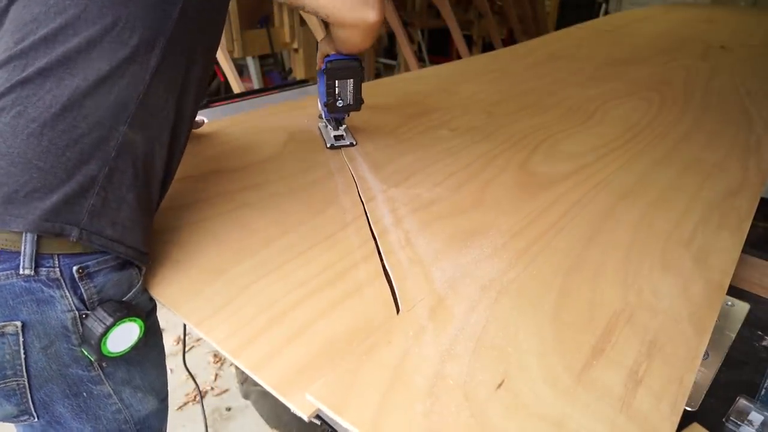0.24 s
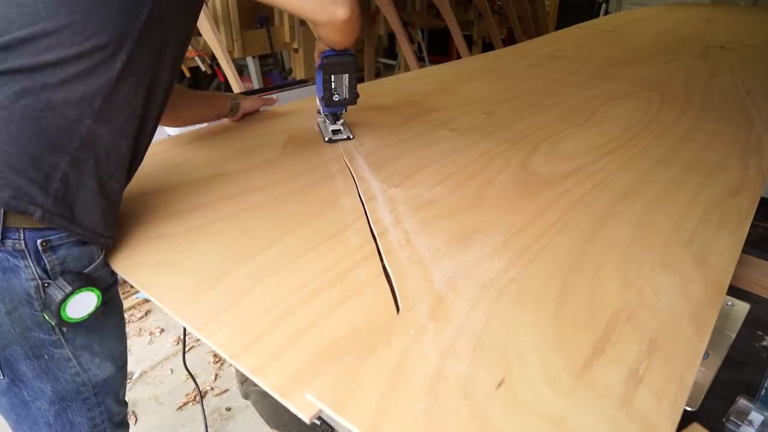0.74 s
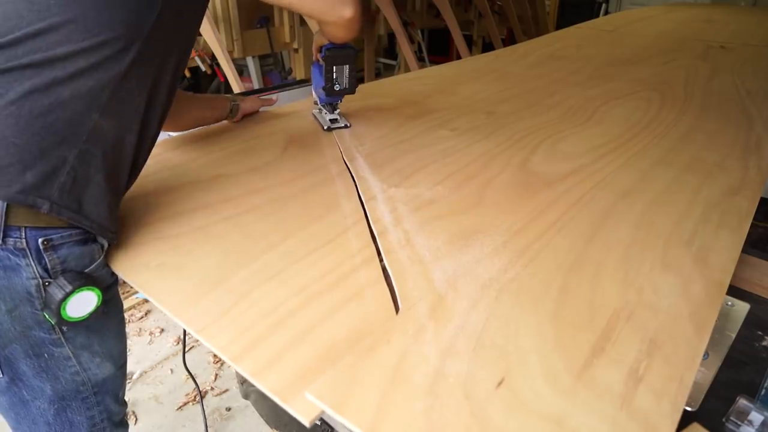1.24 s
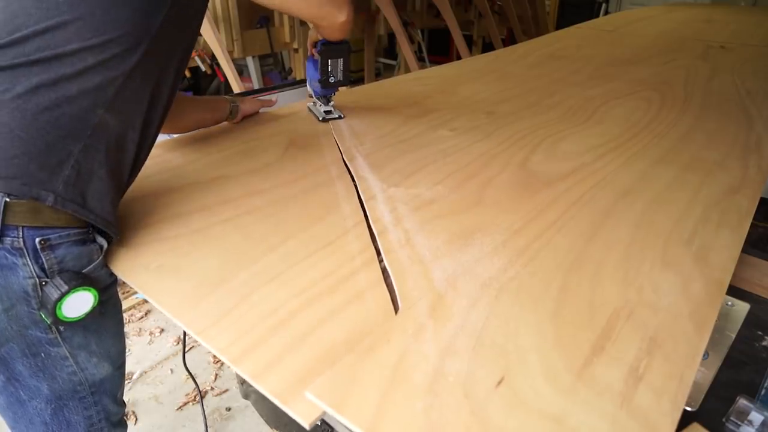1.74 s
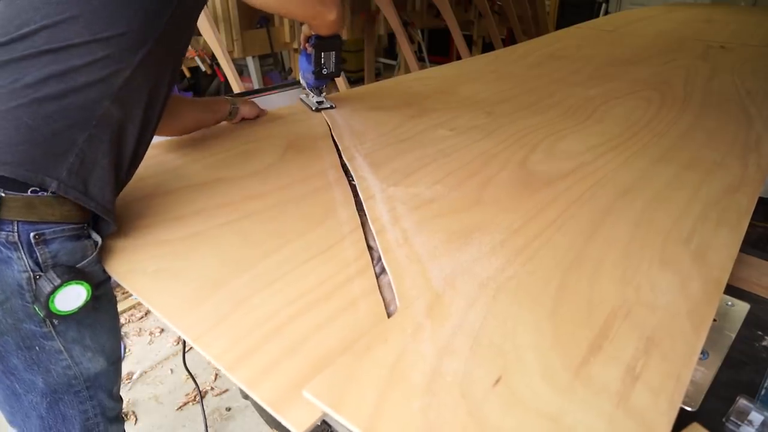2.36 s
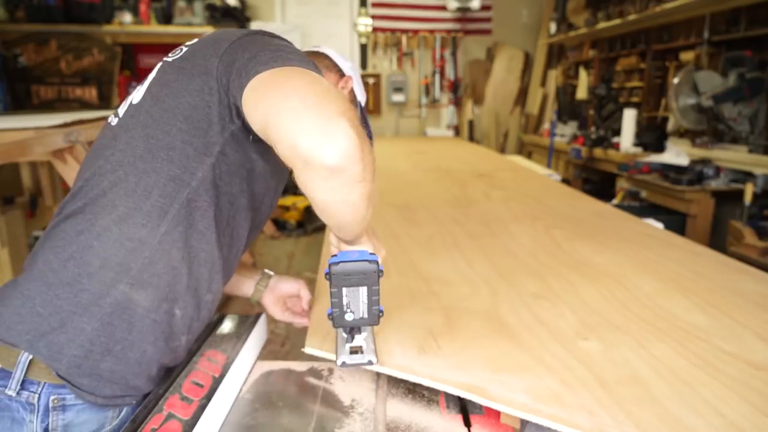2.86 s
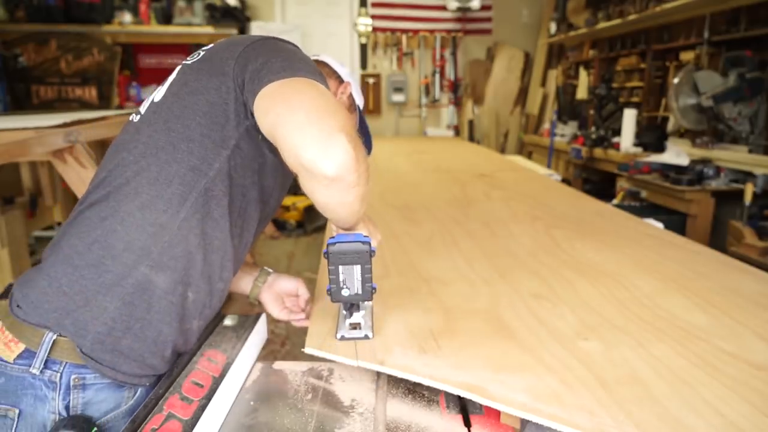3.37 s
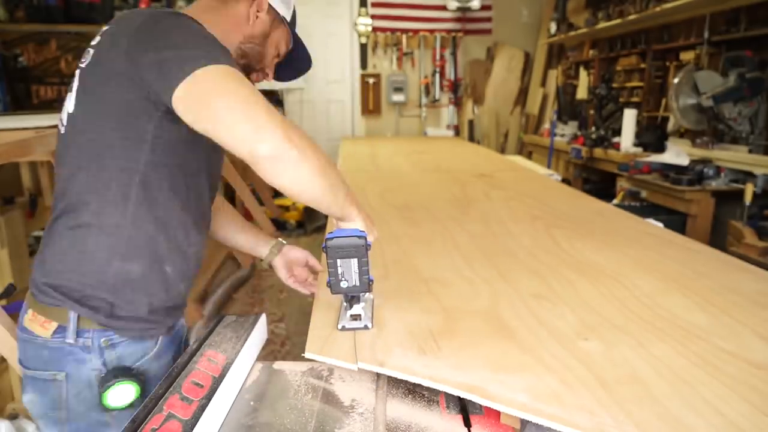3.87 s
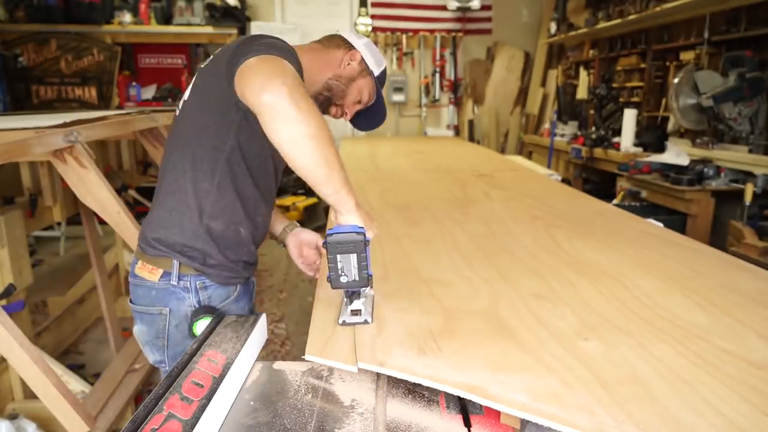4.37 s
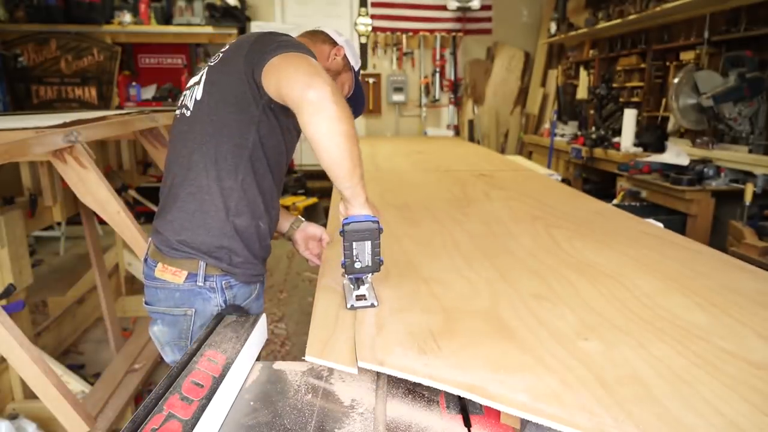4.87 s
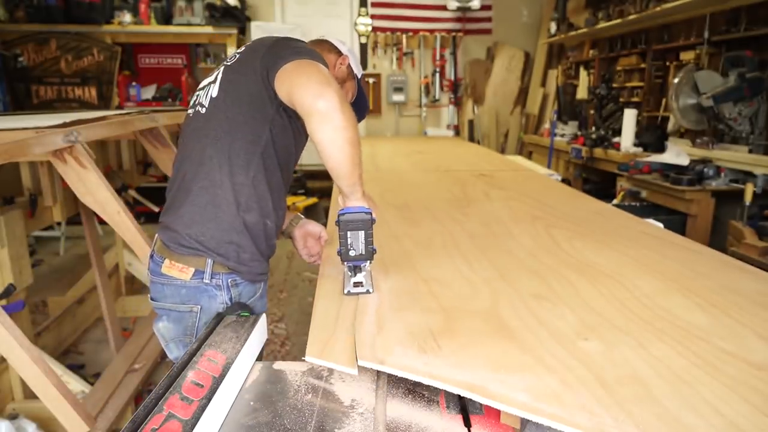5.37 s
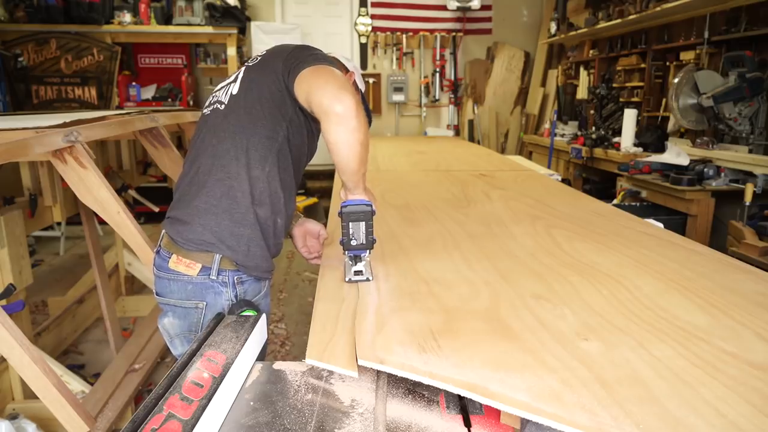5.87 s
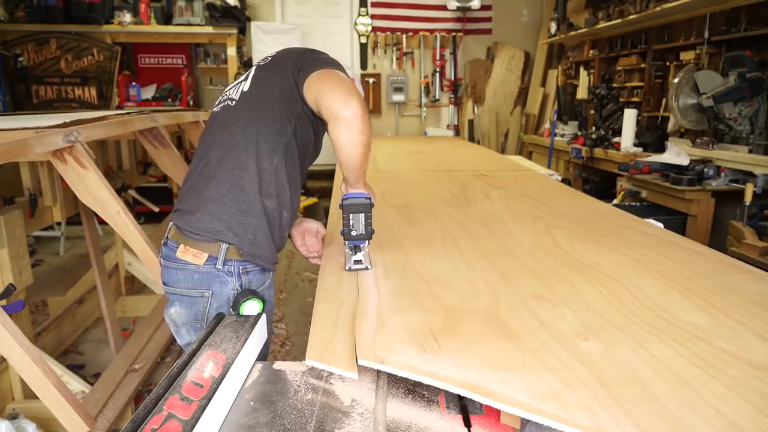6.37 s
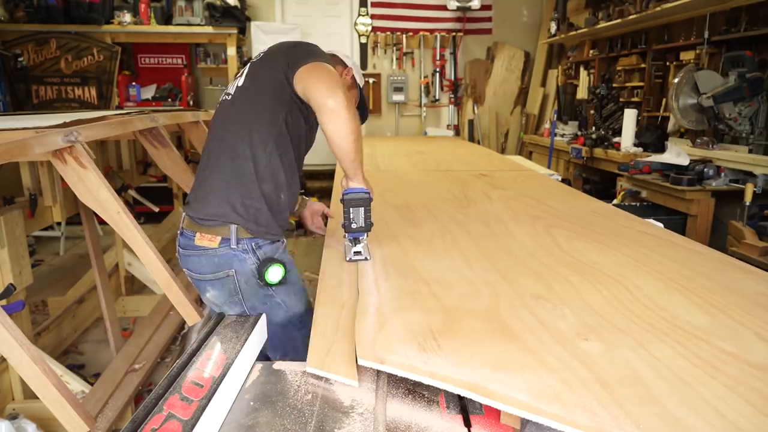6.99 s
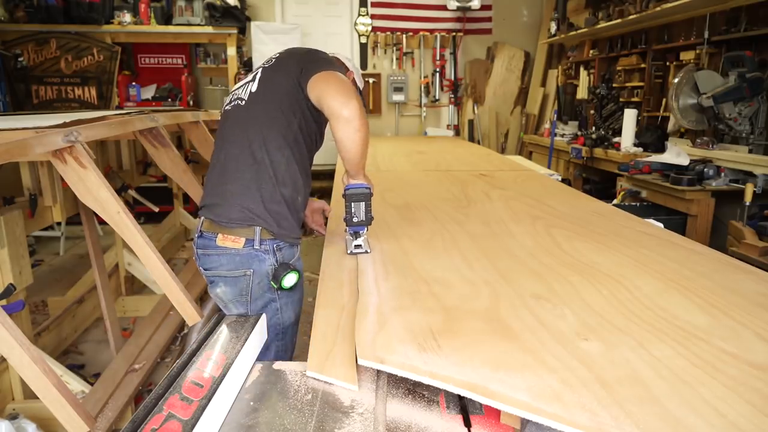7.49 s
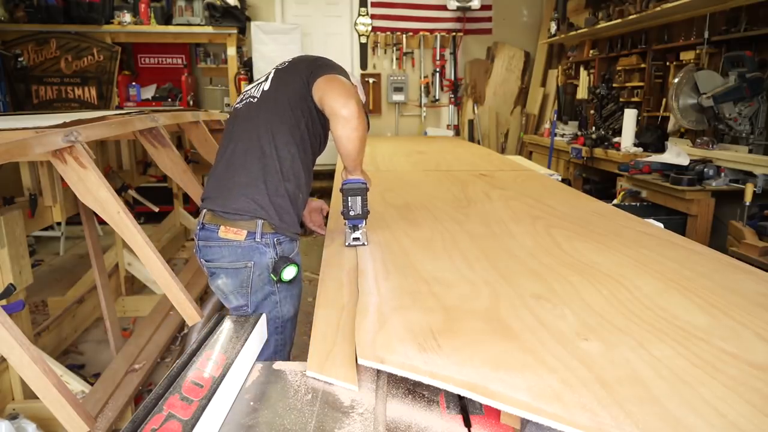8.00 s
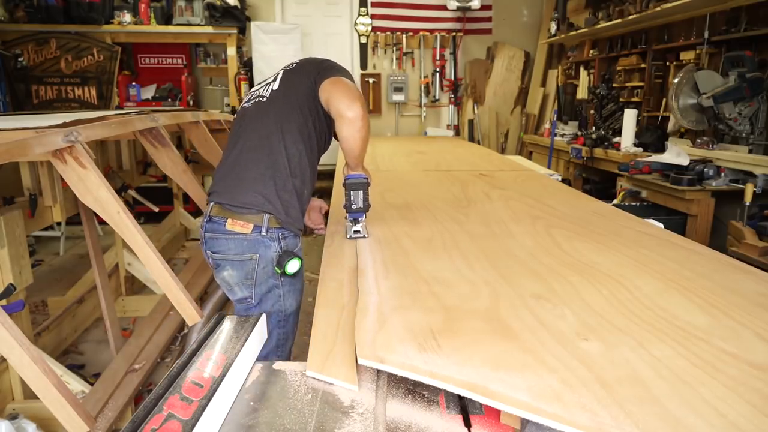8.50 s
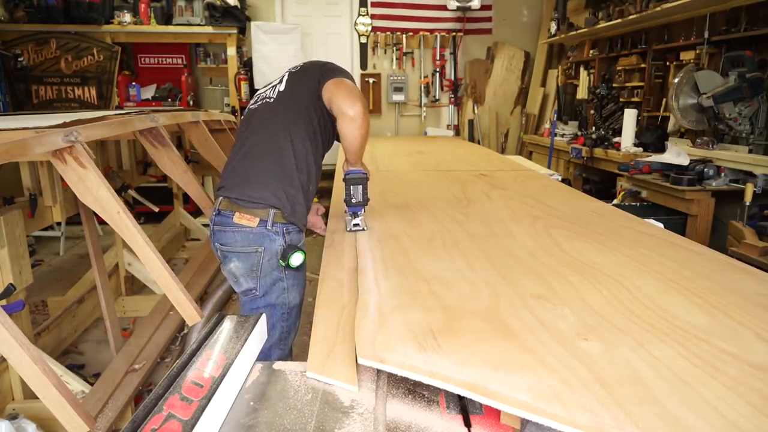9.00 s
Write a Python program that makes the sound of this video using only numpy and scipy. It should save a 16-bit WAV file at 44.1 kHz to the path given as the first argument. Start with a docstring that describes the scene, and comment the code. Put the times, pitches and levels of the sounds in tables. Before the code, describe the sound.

A cordless jigsaw is already cutting plywood, heard close and in fast motion, its strokes blurring into a bright, rasping whine over the sheet's softer hum. It stops at 0.4 seconds and restarts with a trigger click at 0.6. At about 2.5 seconds an offcut drops with a quick clatter; after an instant of silence the saw is back at full speed. It cuts out near 3.8 seconds, then stutters back at 4 seconds with faint clicks, lower in pitch, the blade catching with a sharp crack at 4.2. The pitch jumps back up at 4.5 and holds, with a shifting metallic ring. Another short gap comes at 6.9 seconds; the saw resumes lower, steps up again around 8.1 and keeps cutting until about 9.3. The small workshop adds only a very short reverberation, with almost no background noise.

```python
"""A rasping whine: a cordless jigsaw cuts plywood in a small workshop, heard in fast motion, so that
its strokes blur into a pitch. The crank knocks and the teeth rasp in time with the stroke, and the
sheet hums in forced vibration on harmonics of the stroke rate. The trigger is let go several times;
once an offcut drops, and after a brief silence the sound jumps to the saw already running."""
import sys
import numpy as np
from scipy import signal
from scipy.fft import rfft, irfft, next_fast_len
from scipy.io import wavfile
from scipy.ndimage import map_coordinates

SR = 44100
rng = np.random.default_rng(int(sys.argv[2]) if len(sys.argv) > 2 else 0)


def wrap_up_sound(samples):
    """Save the sound to the file named by the first command line argument, as 16-bit audio."""
    columns = np.atleast_2d(samples).T
    # keep every value between -1 and 1, then stretch to whole-number steps
    tamed = np.clip(columns, -1, 1)
    steps = np.round(tamed * 32767).astype(np.int16)
    wavfile.write(sys.argv[1], SR, steps)


N = 407484


def saw():
    """Periodic forcing: one stroke drives rasp and hum, from spin-up until the brake grips."""
    # Each row: start, stop and spin-up time in seconds, starting drop in dB, hum gain in dB.
    stretches = [(0, 0.389, .01, 3, 1), (.567, 1.96, .055, 22.5, -1), (1.96, 2.536, .01, 8, 0),
                 (2.642, 3.753, .01, 0, -3), (4.02, 4.111, 0.049, 16, -6.5), (4.16, 4.488, 0.044, 20, 1),
                 (4.487, 6.902, .01, 1, 1), (7.066, 8.081, .045, 28, 0), (8.08, 9.3, .01, -5, 1.5)]
    # Each entry: the place on the sheet where that stretch is cut, as an index.
    places = [0, 1, 7, 2, 3, 3, 4, 5, 6]
    # Each row: time in seconds, strokes per second.
    pace = [(0, 186.9), (.63, 186.3), (1.03, 186.7), (1.64, 186.3), (1.84, 187), (2.0, 185.5),
            (2.25, 186.2), (2.55, 185.6), (2.64, 188.7), (3.35, 187.6), (3.76, 188.6), (4.02, 162.6),
            (4.12, 162.5), (4.16, 131), (4.2, 138), (4.34, 141), (4.36, 151), (4.466, 153.5), (4.5, 187),
            (4.65, 188.7), (5.28, 187.5), (6.45, 187.8), (6.55, 186.6), (6.9, 187.7), (7.07, 151.3),
            (7.58, 149.5), (8.05, 150.5), (8.09, 187), (8.16, 187.6), (8.71, 186.6), (8.8, 187.4),
            (9.24, 186.9)]
    # Load on the blade. Each row: time in seconds, then rasp gain, its lower-band gain and hum gain in dB.
    load = [(0, -31.5, 4.5, -39.5), (.39, -32, 5, -44.5), (.65, -31.5, 3, -40.5), (1.26, -33.5, 2, -42),
            (1.85, -34, -1.5, -45), (2.0, -34.5, -0.5, -38.5), (2.4, -33.5, 2.5, -42),
            (2.543, -34, -5, -34.5), (2.642, -32, 4, -41), (2.96, -33.5, 1.5, -45.5),
            (3.75, -31.5, -0.5, -44.5), (4.08, -33.5, 5, -43), (4.12, -37.5, 6, -46),
            (4.2, -29, -0.5, -46.5), (4.45, -33, 0, -49.5), (4.52, -30, -9, -48), (4.8, -29, -2.5, -47),
            (5.87, -30, -3, -48.5), (6.77, -29, 2, -46), (6.91, -30.5, 4, -47), (7.12, -32.5, -5, -48),
            (8.04, -33, -3.5, -46.5), (8.27, -31, 0, -48.5), (9.24, -33, -5.5, -51.5)]
    # Each entry: spread of the hum's phases at one place, in cycles; zero is one sharp blow a stroke.
    blurs = [0.1, 0.12, 0.2, 0.42, 0.27, 0.27, 0.13, 0.032]
    hum_lag, hum_depth = 1.74, 0.92  # the hum's rise time and starting drop, relative to the rasp's
    load_s, *load_curves = np.transpose(load)
    sawing, humming, turns = np.zeros((3, N))
    join = int(.008 * SR)
    for (start, stop, spin_up, down_db, gain_db), place in zip(stretches, places):
        at = np.arange(int(start * SR), min(int(stop * SR) + join, N))
        s = at / SR
        rasp_db, lower_db, hum_db = (np.interp(s, load_s, curve) for curve in load_curves)
        rasp_rise = from_db(-down_db * np.clip(1 - (s - start) / spin_up, 0, 1))
        hum_rise = from_db(-hum_depth * down_db * np.clip(1 - (s - start) / (hum_lag * spin_up), 0, 1))
        # the motor speed flutters a little under load; one crank turn is one stroke
        stroke_hz = np.interp(s, *np.transpose(pace)) * (1 + .001 * drift(15.0, len(at)))
        turns = turns[-join - 1] % 1 + np.cumsum(stroke_hz) / SR
        # stretches that overlap cross-fade at equal power
        fade_in = at - at[0] + join * (not sawing[at[0]])
        fade_out = at[-1] - at + join * (at[-1] == N - 1)
        edges = np.sqrt(np.clip(np.minimum(fade_in, fade_out) / join, 0, 1))
        rumble = bench_rumble(len(at))
        hum = sheet_hum(s, turns, place, blurs[place], hum_db)
        rasp = blade_ringing(blade_rasp(turns, place, lower_db, blurs[place]), s)
        humming[at] += edges * hum_rise * from_db(gain_db) * hum
        sawing[at] += edges * rasp_rise * from_db(rasp_db) * (rasp + rumble)
    return sawing, humming


def blade_rasp(turns, place, lower_db, blur):
    """Modal excitation: knocks, tooth noise and whine drive the many modes of blade and shoe."""
    # Contacts within one stroke. Each row: position as a share of the stroke, relative level in dB.
    contacts = [(.02, 6), (0.272, 2.5), (.5, 8.5), (.76, -19)]
    # One rasp spectrum per place. Each point: frequency in Hz, relative gain in dB.
    spectra = [
        [(1470, -41), (2500, -8), (2890, -5.5), (3880, -13.5), (6610, -0.5), (7830, -4), (9210, -1), (10300, 0),
         (12000, -6.5), (15800, -10)],
        [(1760, -16), (3000, -5), (3350, -17), (4100, -13.5), (4670, -7.5), (4970, -9), (6120, -7), (7280, -8),
         (9400, -1.5), (10600, -5.5), (13300, -14), (15700, -6)],
        [(1470, -46), (2500, -13), (3100, -20.5), (4190, -12.5), (6160, -7), (7480, -7), (9210, -6),
         (11200, -6.5), (15800, -15.5)],
        [(1470, -44), (2500, -19.5), (4420, -13), (5320, -8.5), (7140, 1), (8460, -10), (9000, -10),
         (12900, -8), (15800, -7.5)],
        [(1470, -23), (2600, -20), (3760, -18), (4710, -9), (7480, -7.5), (9140, 0), (11300, -2.5), (12200, -6),
         (15800, -8)],
        [(1470, -41), (2500, -14.5), (3130, -20.5), (3730, -11.5), (5240, -8.5), (5750, -14), (6710, -5.5),
         (8390, -5), (9790, -10.5), (12700, -0.5), (15800, -10.5)],
        [(1470, -47), (2500, -5.5), (2870, -7), (3200, -20.5), (4820, -8.5), (5240, -7), (5710, -8),
         (8080, -10), (8930, -3.5), (11300, -1.5), (15800, -8.5)],
        [(1760, -24), (3000, -11), (3500, -8), (4100, -12.5), (4700, -6), (6100, -8), (7500, -6.5), (9200, -1),
         (10600, -8.5), (13300, -16), (15700, -3.5)],
    ]
    # Each entry: level of the whine against the tooth noise at one place, in dB.
    whine_db = [6, 8, 6, 2, 6, 7, 6, 8]
    burst_s, jitter_s, knock_spread_db, tilt_db_per_octave = 0.0006, 2.2e-4, 5, 3.5
    size, strokes = len(turns), np.arange(int(turns[-1]))
    shares, contact_db = np.transpose(contacts)
    at = np.interp((strokes[:, None] + shares).ravel(), turns, np.arange(size))
    strength = from_db(np.tile(contact_db, len(strokes)) + rng.normal(0, 1.65, len(at)))
    clicks = np.zeros(size)
    clicks[at.astype(int)] = strength
    pole = np.exp(-1 / (burst_s * SR))
    bursts = rms_one(signal.lfilter([1], [1, -2 * pole, pole * pole], clicks))
    teeth = rms_one(rng.standard_normal(size) * (bursts + from_db(-2.5)))
    scrape = teeth + from_db(whine_db[place]) * rms_one(gear_whine(turns, blur))
    modes = 0
    for k, hz in enumerate(np.arange(2200, 16200, 500)):
        # each contact reaches each mode with its own timing, strength and sign
        arrivals = np.clip(at + rng.normal(0, jitter_s * SR, len(at)), 0, size - 1).astype(int)
        uneven = from_db(knock_spread_db * np.clip(rng.normal(size=len(at)), -3, 1.1))
        knocks = np.zeros(size)
        knocks[arrivals] = strength * uneven * rng.choice([-1, 1], len(at))
        drive = scrape + from_db(5.5 + tilt_db_per_octave * np.log2(hz / 8000)) * rms_one(knocks)
        swell = np.exp(0.24 * drift(0.9, size))  # modes swell and sink as the saw moves and tilts
        modes = modes + (-1) ** k * swell * resonance(drive, hz + rng.uniform(-120, 170), width_hz=660)
    flattened = np.tanh(rms_one(modes) / 3.0)  # the hardest knocks saturate at three times the rms
    rasp = colour(flattened, spectra[place])
    lower_band = signal.sosfilt(signal.butter(4, 7500, fs=SR, output="sos"), rasp)
    return rasp + lower_band * (from_db(lower_db) - 1)


def gear_whine(turns, blur):
    """Periodicity gives a line spectrum: gears and teeth repeat nearly the same scrape each stroke."""
    # The gear mesh stands out near 58 teeth a stroke. Each row: harmonic number, relative level in dB.
    spectrum = [(16, 2), (24, -3.5), (36, -0.5), (40, -8), (54, -8), (59, 0.5), (63, 1.5), (90, -8.5)]
    patterns_per_s, phase_spread = 2.02, 4.01 * blur
    age = np.arange(len(turns)) / SR * patterns_per_s
    heights = from_db(np.interp(np.arange(513), *np.transpose(spectrum), left=-60, right=-60))
    phases = phase_spread * rng.normal(size=(int(age[-1]) + 2, 513))
    patterns = irfft(heights * np.exp(2j * np.pi * phases))
    # each pattern lasts one stroke and slowly blends into the next
    return map_coordinates(patterns, [age, turns % 1 * 1024], order=1, mode="grid-wrap")


def blade_ringing(rasp, s):
    """Resonance: lightly damped blade modes rise out of the rasp and sink back."""
    # Each row: time of the peak in seconds, frequency in Hz, gain in dB, half-width in seconds.
    rings = [(0.087, 9600, 3, .15), (0.29, 10570, -2, .1), (0.783, 9250, 1.5, .2), (1.0, 10400, 3.5, 0.38),
             (2.184, 9000, 1.5, 0.16), (3.4, 9370, 5.5, 0.61), (3.45, 8220, -4, 0.15), (5.4, 9000, -6, .2),
             (5.77, 9200, 0, 0.14), (6.396, 10900, -1, 0.56), (8.4, 5200, 5, 0.58), (7.97, 5200, 4, .15),
             (2.515, 2500, 3, .03), (2.53, 4100, 3, .02)]
    return rasp + sum(from_db(db) * np.exp(-((s - at) / span) ** 2) * resonance(rasp, hz, width_hz=292)
                      for at, hz, db, span in rings if s[0] < at < s[-1])


def sheet_hum(s, turns, place, blur, hum_db):
    """Forced vibration: the sheet follows harmonics of the stroke, each wavering as the saw moves."""
    # Each entry: harmonic number of one upper partial.
    upper_harmonics = [6, 8, 9, 10, 11, 12, 13, 14, 15, 16]
    # Each row: relative levels of the upper partials at one place, in dB.
    upper_db = [
        [-31, -19, -13, -14, -7, -29, -11, -16, -5.5, -25],
        [-6.5, -4.5, -7.5, -1, -7, -5.5, -6.5, 1.5, -0.5, -33],
        [-1.5, -8.5, -15, 0.5, 4, -5.5, 5.5, -3, 4, -17.5],
        [-13, 6, 3, 0, 2, -16, -2, -10, -17, 1],
        [-9.5, -4, -14, -12, 1, 0.5, 2, -4, -3, -36],
        [-20, -3, -2, 2, 2, -10, 0, -1.5, -2, -9],
        [-1.5, 3.5, -6, -1, 1, -5, 4, 8.5, 1, -22],
        [-10, -7.5, -13, -5.5, -37, -2.5, -10.5, -2.5, -10, -13],
    ]
    # Each entry: harmonic number of one low tone.
    low_harmonics = [1, 2, 3, 4, 5, 7]
    # Each row: levels of the low tones at one place, in dB before the stretch's gain.
    low_db = [
        [-77, -76, -71, -69.5, -62, -69],
        [-75.5, -75, -71, -64.5, -60, -59.5],
        [-78.5, -77, -74.5, -73, -64.5, -59],
        [-91, -81.5, -72.5, -78, -69.5, -60],
        [-83.5, -74.5, -71, -70.5, -67.5, -60.5],
        [-84, -74, -71, -87, -63.5, -62.5],
        [-81, -74.5, -80, -79, -70, -68],
        [-83, -64, -65.5, -60, -56.5, -48.5],
    ]
    # Sheet noise under the hum. Each row: frequency in Hz, relative spectral level in dB.
    chatter_spectrum = [(400, -32.5), (700, -17.5), (1000, -6.5), (2200, 4.5), (3500, 0), (5000, -11)]
    flutter_db_per_harmonic = 0.1466
    whistle_harmonic = 23  # a high whistle near 4.3 kHz that swells and fades
    size, upper, tones = len(turns), 0, 0
    for k, level_db in zip(upper_harmonics, upper_db[place]):
        wave = np.cos(2 * np.pi * (k * turns + blur * rng.normal()))
        waver_db = 1.52 * drift(4.7, size) + flutter_db_per_harmonic * k * drift(55.0, size)
        upper = upper + from_db(level_db + waver_db) * wave
        tones = tones + sheet_swell(k, s) * from_db(3 * drift(30.0, size)) * wave
    for k, level_db in zip(low_harmonics, low_db[place]):
        height = from_db(level_db + 2.17 * drift(2.25, size)) + sheet_swell(k, s)
        flutter = from_db(1.5 * drift(30.0, size))
        tones = tones + height * flutter * np.cos(2 * np.pi * (k * turns + blur * rng.normal()))
    tones = tones + sheet_swell(whistle_harmonic, s) * np.cos(2 * np.pi * whistle_harmonic * turns)
    throb = 1 + 0.27 * np.cos(2 * np.pi * turns)
    chatter = colour(rng.standard_normal(size) * throb, chatter_spectrum)
    body = from_db(-5.0) * rms_one(upper) + from_db(-6.5) * chatter
    return from_db(hum_db) * body + np.sqrt(2) * tones


def sheet_swell(harmonic, s):
    """Response depends on the driving point: a harmonic swells as the saw passes a lively spot."""
    # Each row: time of the peak in seconds, harmonic number, level in dB, half-width in seconds.
    swells = [(0.033, 7, -47.5, 0.21), (0.16, 13, -49.5, .25), (1.22, 13, -48, 0.31), (5.68, 13, -58, 0.11),
              (2.6, 23, -62, .4), (0.91, 7, -49.5, 0.11), (1.5, 3, -62, 0.39), (1.3, 5, -62.5, 0.69),
              (2.2, 2, -64.5, 0.16), (2.49, 4, -50.5, 0.1), (2.49, 5, -50, 0.052), (2.8, 1, -73, 0.35),
              (2.87, 7, -49, 0.052), (2.987, 5, -53, 0.029), (3.651, 3, -66, 0.27), (4.3, 7, -64, 0.046),
              (4.46, 7, -50, 0.031), (4.7, 5, -51.5, 0.11), (2.32, 7, -54, .07), (5.9, 1, -71, 0.98),
              (5.776, 7, -47, 0.077), (6.048, 11, -53.5, 0.11), (6.45, 11, -59.5, .3), (6.63, 5, -60, 0.13),
              (7.315, 7, -59, 0.2), (7.55, 5, -55, 0.075), (7.973, 3, -63, 0.1), (8.2, 13, -57.5, 0.23),
              (1.54, 9, -56.5, 0.56), (3.1, 11, -60.5, 0.32), (8.8, 8, -63, 0.14), (8.868, 11, -60, .12),
              (9.0, 1, -67, 0.36), (9.15, 3, -70, 0.19)]
    return sum(from_db(db) * np.exp(-np.abs((s - at) / span) ** 1.83)
               for at, k, db, span in swells if round(k) == harmonic)


def shoe_bumps():
    """Free vibration: the shoe bumps the sheet, whose low modes ring down."""
    # Each row: time in seconds, strength in dB.
    bumps = [(.655, -47), (.828, -47), (.922, -49), (.963, -56), (1.11, -55), (1.243, -57), (4.855, -51)]
    # Each row: frequency in Hz, relative level in dB, time to fall 60 dB in seconds.
    sheet_modes = [(75, -6.5, 0.03), (140, -10, 0.02), (233, -1, 0.012)]
    return struck(bumps, sheet_modes)


def blade_snaps():
    """Impulse response: the blade catches, and heavily damped high modes give short bright cracks."""
    # Each row: time in seconds, strength in dB.
    catches = [(4.1962, -23), (4.2065, -26), (4.2152, -32)]
    return struck(catches, modes=[(4700, -3.0, 0.0079), (6940, -16, 0.0035), (11000, 9, .004)])


def offcut_drop():
    """Impact excitation: the falling offcut knocks three times and clatters."""
    # Each row: time in seconds, strength in dB.
    knocks = [(2.526, -22.5), (2.538, -31), (2.553, -32.5)]
    # Each row: frequency in Hz, relative spectral level in dB.
    spectrum = [(150, -28), (400, -1.5), (1200, -3), (2500, -6.5), (4200, -7), (12000, -4.5)]
    return clatter(knocks, spectrum, t60=0.14)


def trigger_clicks():
    """Structure-borne sound: each click of the trigger rattles the housing."""
    # Each row: time in seconds, strength in dB.
    clicks = [(0.566, -36.5), (3.964, -59.5), (4.02, -45), (4.162, -45), (7.065, -41)]
    # Each row: frequency in Hz, relative spectral level in dB.
    spectrum = [(500, -14), (1400, 2), (5000, -9), (14000, -2)]
    return clatter(clicks, spectrum, t60=0.051)


def bench_rumble(size):
    """Transmitted vibration: the bench shakes with a low noise, far weaker than the rasp."""
    # Each row: frequency in Hz, relative spectral level in dB.
    spectrum = [(30, -1), (100, -5.5), (300, -5), (700, -2), (1200, -14.5)]
    return from_db(-35 + 1.9 * drift(12.0, size)) * colour(rng.standard_normal(size), spectrum)


def workshop(x, t60=0.092, level_db=-9.5):
    """Reverberation: dense reflections form a short exponential tail, thin in the bass."""
    t = np.arange(int(.3 * SR)) / SR
    tail = rng.standard_normal(len(t)) * from_db(-60 * t / t60) * (t > .002)
    tail = signal.sosfilt(signal.butter(1, 800, "high", fs=SR, output="sos"), tail)
    return from_db(level_db) * signal.fftconvolve(x, tail / np.sqrt(np.sum(tail ** 2)))[:N]


def noise_floor():
    """Ambient noise: a faint, mostly low background whose level wavers."""
    # Each row: frequency in Hz, relative spectral level in dB.
    spectrum = [(18, -39), (30, -20), (183, 1), (226, -18), (309, 1), (581, -11.5), (1090, -5),
                (1420, -8.5), (15800, -22)]
    return from_db(-78.5 + 1.5 * drift(6.0, N)) * colour(rng.standard_normal(N), spectrum)


def struck(events, modes):
    """Modal superposition: each blow rings every damped mode with a strength of its own."""
    out = np.zeros(N)
    s, blow_db = np.transpose(events)
    for hz, level_db, t60 in modes:
        clicks = np.full(N, 1e-18)
        clicks[(s * SR).astype(int)] = from_db(blow_db + level_db - 2.5 + rng.normal(0, 1.4, len(s)))
        pole, angle = from_db(-60 / (t60 * SR)), 2 * np.pi * hz / SR
        out += signal.lfilter([.5, 0, -.5], [1, -2 * pole * np.cos(angle), pole * pole], clicks)
    return out


def clatter(events, spectrum, t60):
    """Modal overlap: many small modes merge into coloured noise that dies after each blow."""
    s, blow_db = np.transpose(events)
    clicks = np.full(N, 1e-18)
    clicks[(s * SR).astype(int)] = from_db(blow_db - 8.0)
    envelope = signal.lfilter([1], [1, -from_db(-60 / (t60 * SR))], clicks)
    return envelope * colour(rng.standard_normal(N), spectrum)


def resonance(x, hz, width_hz):
    """Damped oscillator: a two-pole peak of gain 1."""
    r = np.exp(-np.pi * width_hz / SR)
    feedback = [1, -2 * r * np.cos(2 * np.pi * hz / SR), r * r]
    return signal.lfilter([(1 - r * r) / 2, 0, (r * r - 1) / 2], feedback, x)


def colour(x, points):
    """Spectral shaping by (Hz, dB) points on a log-frequency axis; the result has rms 1."""
    size = next_fast_len(len(x))
    hz, db = np.transpose(points)
    bins_hz = np.maximum(np.arange(size // 2 + 1) * SR / size, 1)
    gain = from_db(np.interp(np.log(bins_hz), np.log(hz), db, left=-60))
    return rms_one(irfft(rfft(x, size) * gain, size)[:len(x)])


def drift(rate_hz, size):
    """Random fluctuation: low-passed noise of rms 1."""
    pole = np.exp(-80 * np.pi * rate_hz / SR)  # one step every 40 samples
    slow = signal.lfilter([1], [1, -2 * pole, pole * pole], rng.standard_normal(size // 40 + 2002))
    return np.interp(np.arange(size) / 40, np.arange(size // 40 + 2), rms_one(slow[2000:]))


def from_db(db):
    """Amplitude ratio of a level in dB."""
    return 10 ** (np.asarray(db) / 20)


def rms_one(x):
    """Normalisation to rms 1."""
    return x / np.sqrt(np.mean(x ** 2) + 1e-20)


def scene():
    """Superposition: saw, blows, room and background add, alike in both channels."""
    blows = shoe_bumps() + blade_snaps() + offcut_drop() + trigger_clicks()
    sawing, humming = saw()
    near = sawing + blows
    floor = noise_floor()
    room = workshop(near + from_db(-4) * humming)  # the hum stirs the room less than the rasp
    return np.tile(near + humming + room + floor, (2, 1))


def record(dry):
    """Band limiting: one microphone loses the deep bass and the highest treble."""
    thin = signal.sosfilt(signal.butter(2, 45, "high", fs=SR, output="sos"), dry)
    return signal.sosfilt(signal.cheby2(20, 50, 16100, fs=SR, output="sos"), thin)


dry = scene()
out = record(dry)
wrap_up_sound(out)
```